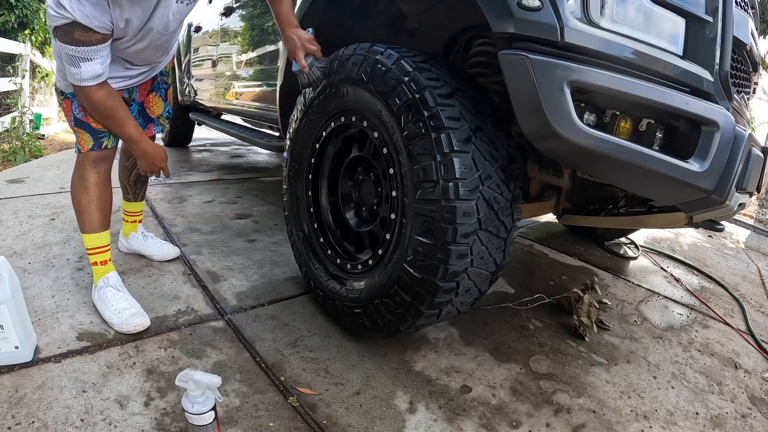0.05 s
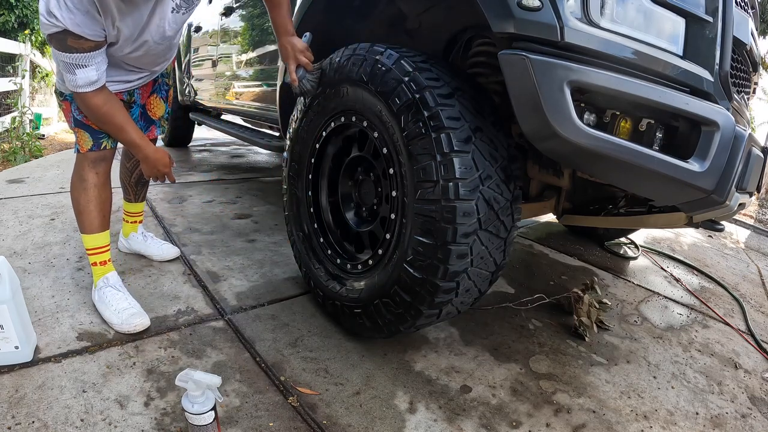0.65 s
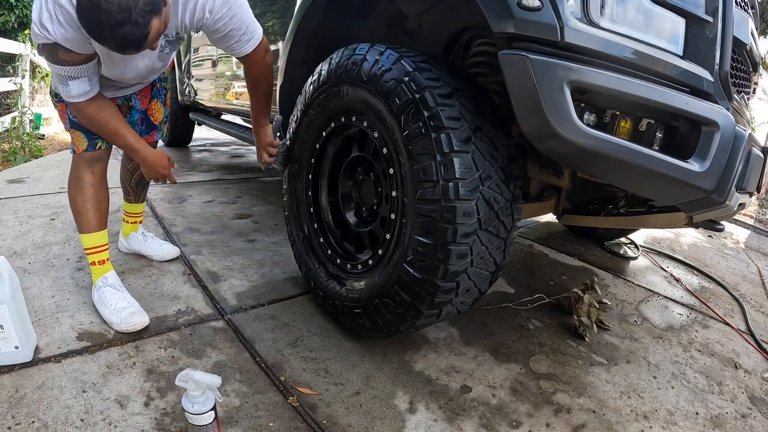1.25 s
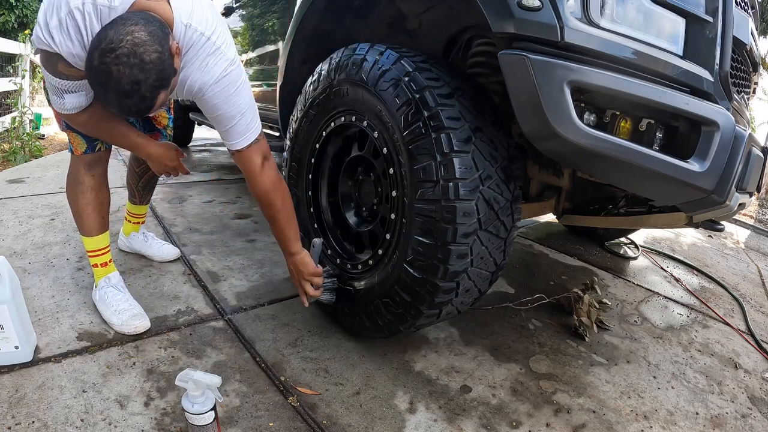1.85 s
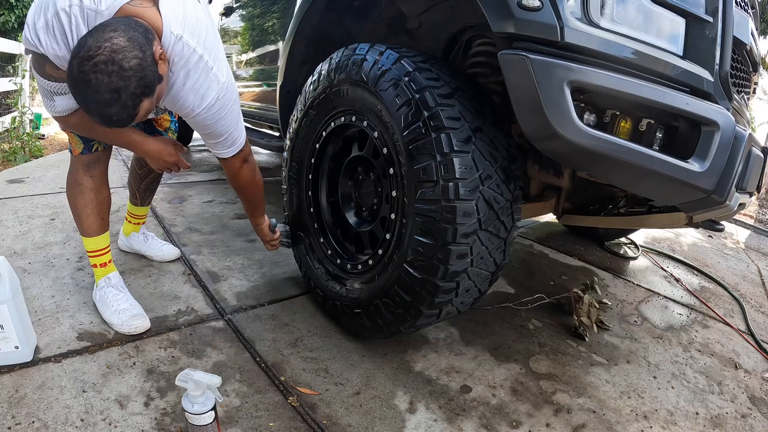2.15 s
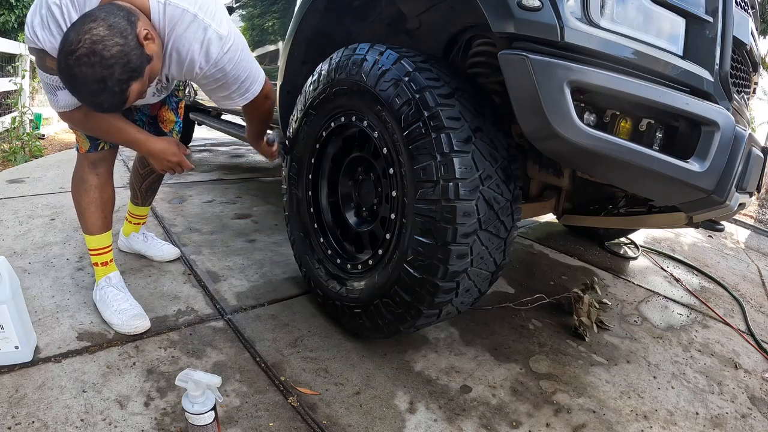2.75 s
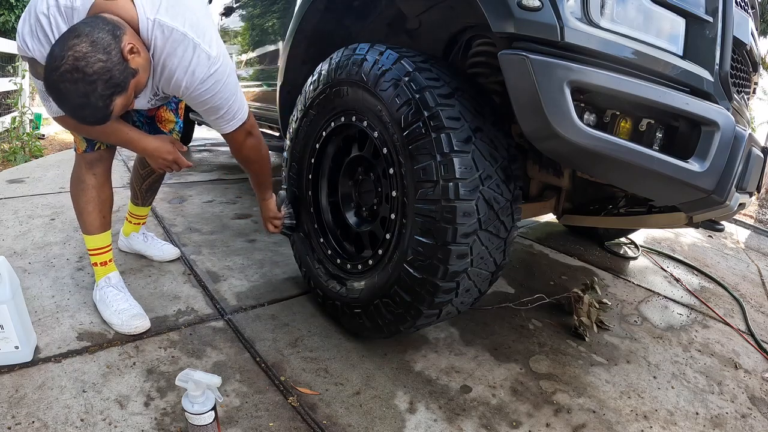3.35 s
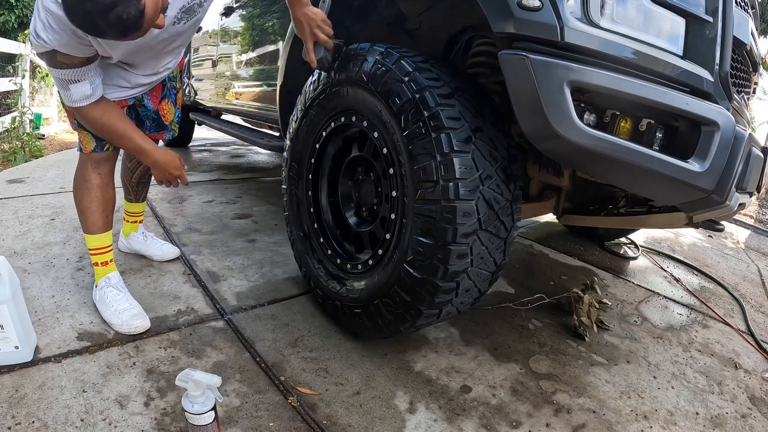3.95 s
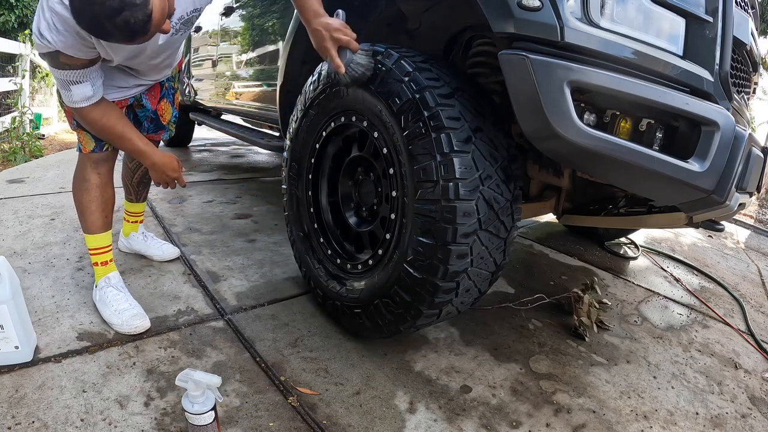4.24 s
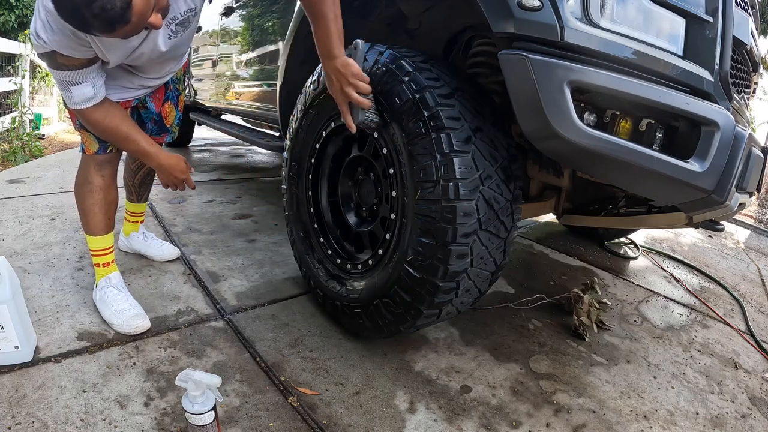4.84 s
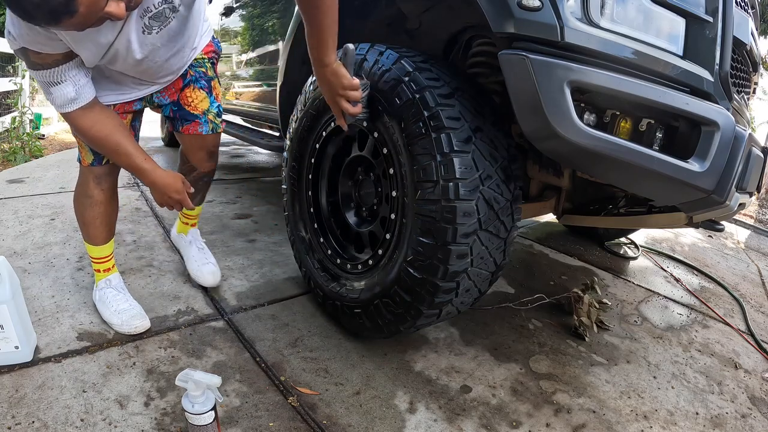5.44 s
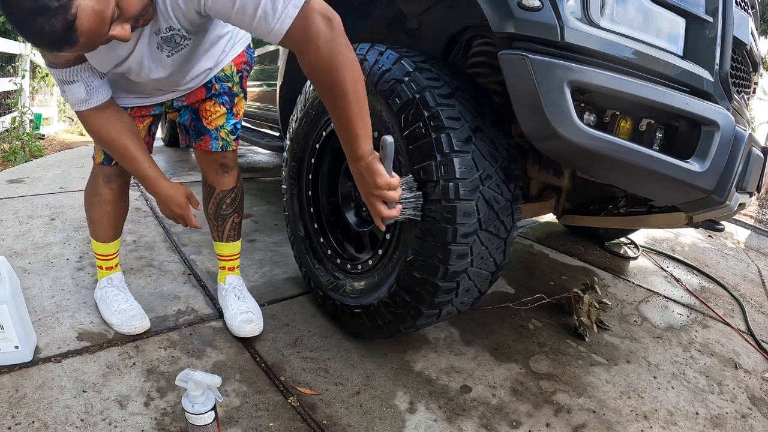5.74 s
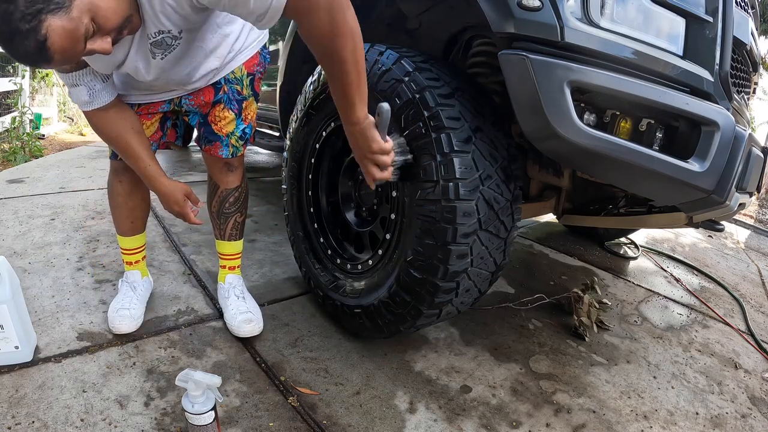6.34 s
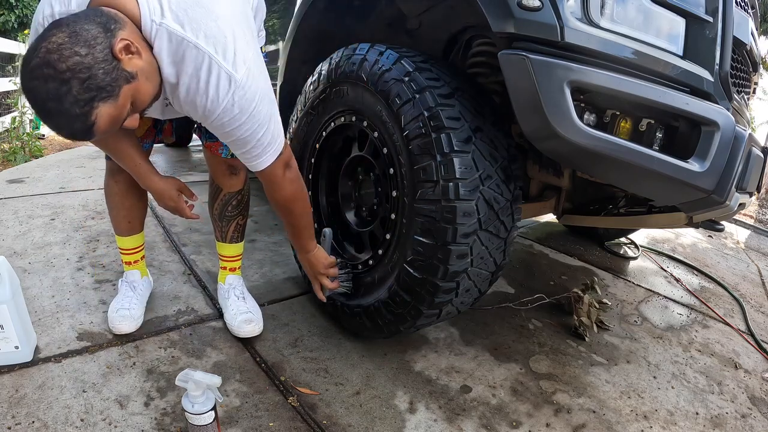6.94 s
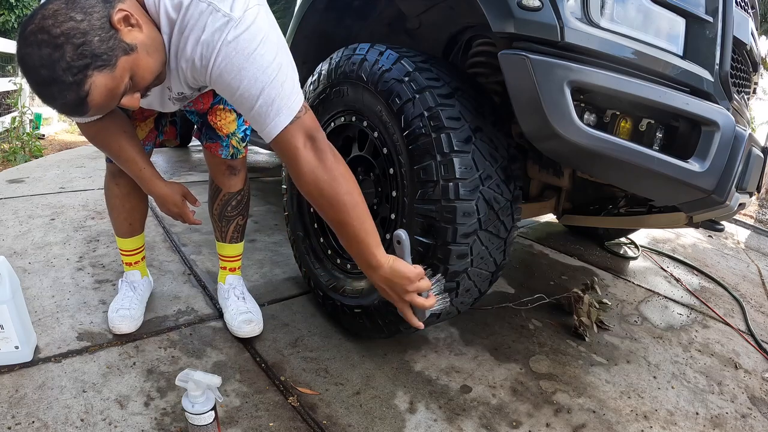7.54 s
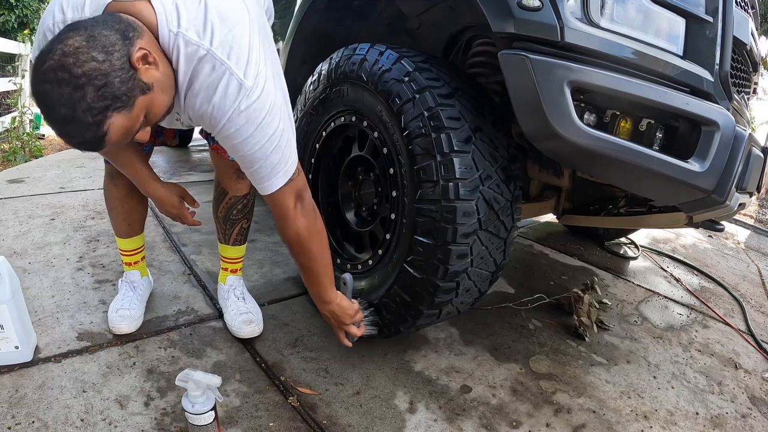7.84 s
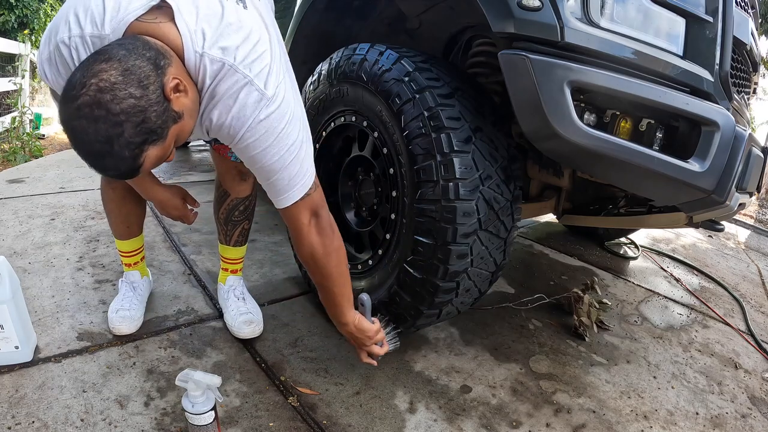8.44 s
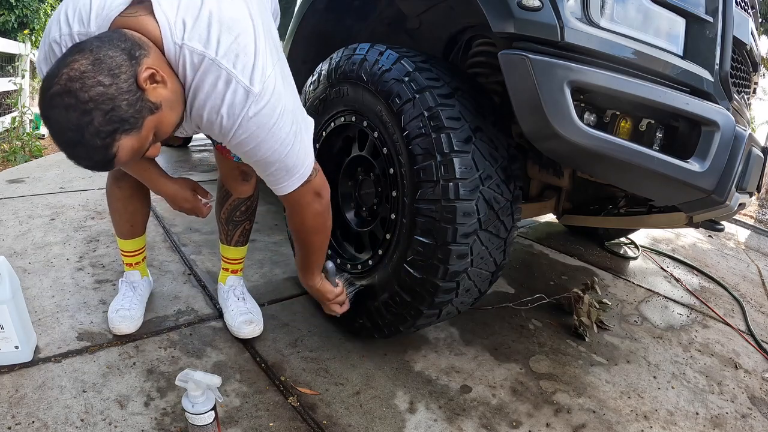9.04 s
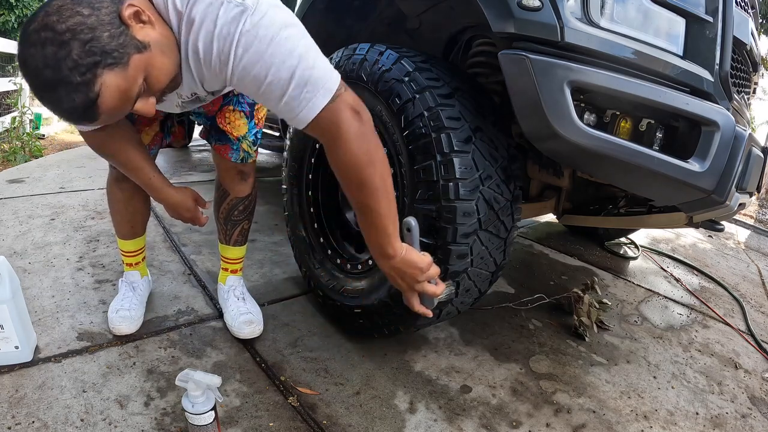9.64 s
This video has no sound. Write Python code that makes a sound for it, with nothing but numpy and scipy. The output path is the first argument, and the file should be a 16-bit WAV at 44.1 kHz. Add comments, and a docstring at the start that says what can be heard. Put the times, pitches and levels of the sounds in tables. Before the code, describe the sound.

Soft brush strokes swish around a wet truck tyre outdoors, faint beneath a steady low rumble of traffic and droning engines.

```python
"""A soft brush spreads wet dressing round the sidewall of a truck tyre on a driveway.
From the start its bristles swish with each stroke, over rumbling traffic, far tyres and two droning engines.
After a second they flick over ribs in the rubber. A shoe scuffs the concrete at 3.4 s, the brush bumps
the tyre from 4.4 s, and the shoe scuffs again near 6 s. The deeper engine fades by about 7 s,
and a few more flicks come with the last strokes."""
import sys
import numpy as np
from scipy import signal
from scipy.fft import rfft, irfft, next_fast_len
from scipy.io import wavfile

SR = 44100
rng = np.random.default_rng(int(sys.argv[2]) if len(sys.argv) > 2 else 0)


def wav_record(signal):
    """Record a signal, one row per channel, as 16-bit PCM in the file named by sys.argv[1]."""
    frames = np.transpose(np.atleast_2d(signal))
    bounded = np.clip(frames, -1, 1)
    # unit amplitude maps onto the largest positive 16-bit level
    quanta = np.round(bounded * 32767).astype(np.int16)
    wavfile.write(sys.argv[1], SR, quanta)


N = 427329
SLOW_STEP = 40  # samples between the points of a slowly changing curve


def brush():
    """Moving bristle tips swish, pressure adds a lower scrub, and the ribbed rubber makes both flutter."""
    # tone of the tips and of the pressed bristles: f/Hz, level/dB
    swish_tone = [(2000,-21),(4500,1.5),(7500,1),(8500,-2),(11000,1),(12300,-2),(13600,-11.5),(15000,-23)]
    scrub_tone = [(500,-15),(1200,6),(2200,0),(2800,1.5),(3300,2.5),(4000,0),(5100,-0.5),(6000,-3),(7500,-4),(8500,-13.5),(13000,-35)]
    # bristles catching on a rib: t/s, relative level/dB, length/s
    rib_catches = [(1.18,-58,0.027),(1.35,-62,.02),(9.236,-57,.012),(9.403,-55,0.013),(9.582,-53,.015),(9.655,-54,.01)]
    swish, scrub = stroke_strength()
    flutter = from_db(1.1 * drift(rate_hz=24))
    tips = friction(swish_tone, slips_per_s=20000, spread_db=1.5)
    shafts = friction(scrub_tone, slips_per_s=14000, spread_db=0.5)
    strokes = tips * swish * from_db(4.5) + shafts * scrub * from_db(1.5)
    flicks = (tips + shafts) * bursts(rib_catches, rise_s=.002)  # the whole tuft springs free at once
    return strokes * flutter + from_db(-5) * flicks


def stroke_strength():
    """Swish and scrub grow with the hand's speed, above a faint creep while the brush touches."""
    # sweeps of the hand: fastest at t/s, time before/s, time after/s, relative swish/dB, relative scrub/dB
    sweeps = [(.11,.16,0.14,-60.5,-46),(.36,0.1,0.12,-60.5,-48),(.66,0.18,.22,-62,-49.5),(1.0,0.17,0.23,-64.5,-55),
              (1.22,0.13,0.51,-65,-61),(1.7,0.19,.23,-61.5,-56),(2.19,.21,0.14,-62.5,-54),(2.45,0.11,.11,-60,-52),
              (2.77,.21,0.15,-59,-50.5),(2.96,0.11,0.1,-75,-63),(3.29,0.14,0.22,-61.5,-53.5),(3.71,0.21,.27,-62,-55),
              (4.02,0.21,0.16,-63.5,-55.5),(4.37,0.14,0.25,-65,-55.5),(4.84,0.15,0.13,-69,-57.5),(5.04,0.14,0.14,-66,-55.5),
              (5.29,0.11,.17,-63.5,-52),(5.58,0.12,0.26,-63.5,-52),(5.93,0.11,0.22,-62.5,-49),(6.38,0.12,0.2,-64.5,-55),
              (6.82,0.35,.43,-62.5,-55.5),(7.48,0.18,.14,-63.5,-56.5),(8.0,0.28,.13,-56,-49.5),(8.13,0.078,0.054,-61,-60),
              (8.34,0.13,0.15,-56.5,-50),(8.67,0.14,0.19,-57,-51.5),(8.87,.1,0.16,-71,-71),(9.26,0.11,0.066,-64,-60),
              (9.52,.15,0.06,-63,-59),(9.62,0.1,.19,-63,-51)]
    t = np.arange(0, N, SLOW_STEP) / SR
    touching = (t < 9.29) | (t > 9.40)  # in between, the creep stops as the brush lifts
    swish, scrub = from_db(-84) * touching, from_db(-63) * touching  # bristles creep as the hand turns
    for fastest_s, rise_s, fall_s, swish_db, scrub_db in sweeps:
        speed = hand_speed(t, fastest_s, rise_s, fall_s)
        swish = np.hypot(swish, from_db(swish_db) * speed)  # hypot adds the powers of two noises
        scrub = np.hypot(scrub, from_db(scrub_db) * speed ** 0.85)
    return in_time(np.column_stack([t, swish, scrub]))


def hand_speed(t, fastest_s, rise_s, fall_s, turn_s=0.049, arch_db=7.5):
    """One sweep of the hand: a shallow arch of speed, from 0 to 1, between two quick turns."""
    start_s, end_s = fastest_s - rise_s, fastest_s + fall_s
    from_turn_s = np.minimum(t - start_s, end_s - t).clip(0)
    moving = 1 - np.exp(-(from_turn_s / turn_s) ** 2)
    off_peak = np.interp(t, [start_s, fastest_s, end_s], [1, 0, 1])
    return moving * from_db(-arch_db * off_peak ** 2)


def rubber_bumps():
    """The brush bumps the hollow rubber, which gives a dull, quickly damped thud."""
    # tone of the rubber: f/Hz, level/dB
    rubber_tone = [(120,-19),(250,-4),(370,0),(550,-9),(1100,-8.5),(2000,-38),(5000,-53)]
    # bumps of the brush: t/s, relative level/dB, length/s
    bumps = [(4.42,-42,0.039),(4.70,-36,0.055),(4.94,-32,0.079),(5.055,-30.5,0.055),(5.71,-38,.03)]
    thud = friction(rubber_tone, slips_per_s=5000, spread_db=3.5)
    return from_db(-1.5) * thud * bursts(bumps, rise_s=.015)


def shoe_scuffs():
    """A sole grinds grit on the concrete."""
    # tone of the grit: f/Hz, level/dB
    grit_tone = [(600,1),(1500,8),(2300,8.5),(3200,2),(4500,-8),(9000,-20)]
    # scuffs of the shoe: t/s, relative level/dB, length/s
    scuffs = [(3.385,-50,.035),(5.685,-46,.015),(5.726,-40.5,0.011),(5.88,-49,0.063),(5.94,-56,.05)]
    crunch = friction(grit_tone, slips_per_s=2500, spread_db=7)
    return from_db(4) * crunch * bursts(scuffs, rise_s=.003)


def friction(tone, slips_per_s, spread_db):
    """Rubbing surfaces stick and slip, making countless tiny clicks of uneven size."""
    # stereo width beside the wheel: f/Hz, side minus mid/dB
    width = [(300,-16),(2000,-6),(5000,-11.5),(7500,-6.5),(10000,-13),(12500,-2.5)]
    # lean to the left: f/Hz, left minus right/dB
    balance = [(500,2.4),(4000,.5),(8000,1.5),(12000,2.9)]
    slipping = rng.random((2, N)) < slips_per_s / SR
    clicks = slipping * rng.standard_normal((2, N))
    sizes = from_db(spread_db * rng.standard_normal((2, N)).clip(-2, 2))
    return shape_stereo(clicks * sizes, tone, width, balance)


def deep_engine():
    """A deep exhaust some way off; load on the engine brings out its higher notes."""
    # engine speed: t/s, crank turns/Hz
    crank = [(0,18.5),(.6,18.25),(1.6,17.6),(2.5,17.05),(3.6,16.75),(4.1,16.8),(4.5,17.25),(5.5,18.1),(6,18.45),(7.3,18.4)]
    # exhaust notes: multiple of the crank speed, relative level/dB
    notes = [(2,-9),(3,-15),(4,-10),(5,0),(6,-18),(7,-4.5),(8,-15),(9,-5.5),(10,-7.5),(12,-17),(13,-15),(15,-20)]
    # load: t/s, gain of the higher notes/dB
    load = [(0,-2),(1.9,-5.5),(2.4,1.5),(3.3,-2.5),(4.5,-0.5),(5.3,-7),(7.3,-5)]
    # swell and fade of the engine: t/s, level/dB
    loudness = [(0,-46),(.6,-32.5),(1.5,-31),(2.6,-24.5),(3.7,-27.5),(4.7,-26.5),(5.4,-31.5),(6.0,-29.5),(7.3,-45)]
    (crank_hz,), (upper_db,), (level_db,) = in_time(crank), in_time(load), in_time(loudness)
    return from_db(level_db) * exhaust(crank_hz, notes, upper_db, upper_above=7, waver_db=1.24)


def droning_engine():
    """A second engine, whose firings blend into a drone that sinks a little, then climbs."""
    # engine speed: t/s, firings/Hz
    firing = [(0,62.6),(1.4,61.7),(3.5,60.7),(4.6,58),(5.1,65),(5.5,72),(5.9,73),(6.5,70.5),(7.5,68),(9.69,67.3)]
    # exhaust notes: multiple of the firing rate, relative level/dB
    notes = [(1,0),(2,0),(3,-7.5),(4,-21),(5,-16),(6,-23),(7,-26),(8,-23)]
    # strength of the drone: t/s, level/dB, gain of the higher notes/dB
    loudness = [(0,-27,-2),(1,-24,-2.5),(1.35,-28,-7),(1.9,-28.5,-6.5),(2.4,-38.5,7),(4.6,-36.5,-4),(5.3,-30,-14),(7.5,-27.5,-15.5),(8.3,-29.5,-8),(9.69,-45,-10)]
    (firing_hz,), (level_db, upper_db) = in_time(firing), in_time(loudness)
    return from_db(level_db) * exhaust(firing_hz, notes, upper_db, upper_above=1, waver_db=0.16)


def exhaust(speed_hz, notes, upper_db, upper_above, waver_db):
    """Exhaust pulses make notes at multiples of the engine speed, loosely in step so that they throb."""
    unsteady_hz = speed_hz * (1 + .002 * drift(rate_hz=6))
    phase = 2 * np.pi * np.cumsum(unsteady_hz) / SR
    sound = np.zeros(N)
    for multiple, level_db in notes:
        gain = from_db(level_db + upper_db * (multiple > upper_above) + waver_db * drift(rate_hz=1.6))
        sound -= gain * np.sqrt(2) * np.cos(multiple * phase + rng.normal(0, 1.2))
    return sound


def traffic():
    """Deep rumble, the lumpy growl of many exhausts, and far tyres whose treads ring near 1000 Hz."""
    # tone of each layer: f/Hz, level/dB
    rumble_tone = [(12,-22),(20,-9),(32,-1),(55,2.5),(110,1),(150,-5.5),(220,-11),(330,-26.5),(700,-46.5),(3000,-83)]
    growl_tone = [(80,-17.5),(160,-2.5),(215,0.5),(280,-2),(325,-9.5),(380,-9),(480,-13.5),(650,-19.5),(1200,-29),(3000,-74)]
    roar_tone = [(200,-20),(500,-1),(700,2.5),(850,0.5),(1100,2),(1500,-1),(2000,-8),(2700,-15),(4500,-23),(7000,-33.5),(9000,-44),(14000,-53)]
    ring_tone = [(600,-37),(850,-16),(905,0),(1000,0.5),(1100,-3),(1250,-8.5),(1400,-9.5),(1700,-14.5),(2500,-40),(6000,-63)]
    # slow swells of each layer: t/s, level/dB
    rumble_level = [(0,-25.5),(1.2,-29.5),(2.4,-27.5),(4.3,-27.5),(5.2,-25),(6.4,-27.5),(8.4,-28),(9.69,-29)]
    growl_level = [(0,-36),(.9,-32),(1.6,-35),(2.4,-32),(3.3,-33.5),(4.7,-32.5),(6.2,-34),(9.69,-34.5)]
    roar_level = [(0,-40),(2.3,-39),(3.2,-40.5),(6,-40.5),(7.7,-39.5),(9.69,-40.5)]
    ring_level = [(0,-45.5),(2.4,-42),(3.1,-44.5),(6,-43.5),(7.5,-40.5),(9.69,-42)]
    rumble = road_noise(rumble_tone, rumble_level)
    growl = road_noise(growl_tone, growl_level) * from_db(0.74 * drift(rate_hz=13))
    roar = road_noise(roar_tone, roar_level)
    ring = road_noise(ring_tone, ring_level)
    return rumble + growl + roar + ring


def road_noise(tone, swells):
    """Noise from a far road: alike in both ears in the bass, wider and to the left higher up."""
    # stereo width of the road: f/Hz, side minus mid/dB
    width = [(25,-32),(65,-55),(140,-36),(280,-24.5),(500,-10.5),(1000,-7),(2000,-6),(4000,-2.5),(10000,0)]
    # lean to the left: f/Hz, left minus right/dB
    balance = [(70,0),(125,.6),(250,1.7),(500,2.8),(750,3.2),(1000,4.9),(2000,2.0),(5000,.7)]
    noise = rng.standard_normal((2, N))
    return shape_stereo(noise, tone, width, balance) * from_db(in_time(swells))


def shape_stereo(noises, tone, width, balance):
    """Give two noises one tone: the mid is what both ears share, the side is how they differ."""
    size = next_fast_len(N)
    hz = np.arange(size // 2 + 1) * SR / size
    mid, side = rfft(noises, size) * from_db(at_hz(tone, hz))
    left_right = np.array([[1], [-1]])
    pair = mid + side * left_right * from_db(at_hz(width, hz))
    pair *= from_db(left_right * at_hz(balance, hz) / 2)
    return rms_one(irfft(pair, size)[:, :N])


def bursts(contacts, rise_s):
    """Loudness curve of short contacts: a quick rise, then a fade."""
    curve, t = np.zeros(N), np.arange(SR // 2) / SR
    for start_s, level_db, length_s in contacts:
        start = int(start_s * SR)
        rise = 1 - np.exp(-t / rise_s)
        fade = np.exp(-(t / length_s) ** 2 / 2)
        curve[start:start + len(t)] += (from_db(level_db) * rise * fade)[:N - start]
    return curve


def drift(rate_hz):
    """A smooth random wobble of typical size 1, mostly slower than the given rate."""
    pole = np.exp(-2 * np.pi * rate_hz * SLOW_STEP / SR)
    warm_up = 2000  # points dropped while the smoothing settles
    noise = rng.standard_normal(N // SLOW_STEP + 2 + warm_up)
    slow = signal.lfilter([1], [1, -2 * pole, pole * pole], noise)[warm_up:]
    return np.interp(np.arange(N) / SLOW_STEP, np.arange(len(slow)), rms_one(slow))


def in_time(rows):
    """Join a table's points with straight lines: one curve for each column after the time."""
    times, *columns = np.transpose(rows)
    return [np.interp(np.arange(N) / SR, times, column) for column in columns]


def at_hz(points, hz):
    """Read between a table's frequencies, with every octave equally wide."""
    frequencies, values = np.transpose(points)
    return np.interp(np.log(hz + 1), np.log(frequencies), values)


def from_db(db):
    """Turn decibels into a number to multiply by."""
    return 10 ** (np.asarray(db) / 20)


def rms_one(x):
    """Scale a signal so that its average power is 1."""
    return x / np.sqrt(np.mean(x ** 2) + 1e-20)


def scene():
    """Open air: every sound arrives directly, with no echo."""
    background = traffic() + deep_engine() + droning_engine()
    return background + brush() + rubber_bumps() + shoe_scuffs()


def record(dry):
    """Cut away the highest treble steeply."""
    cutoff_hz = 13700
    return signal.sosfilt(signal.ellip(10, .2, 80, cutoff_hz, fs=SR, output="sos"), dry)


dry = scene()
out = record(dry)
wav_record(out)
```